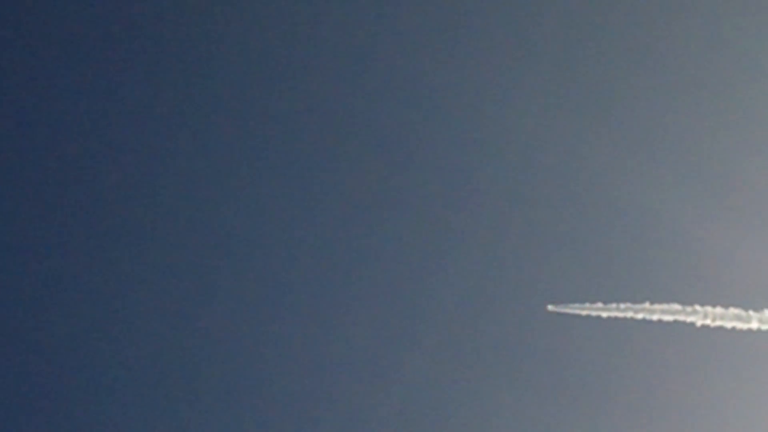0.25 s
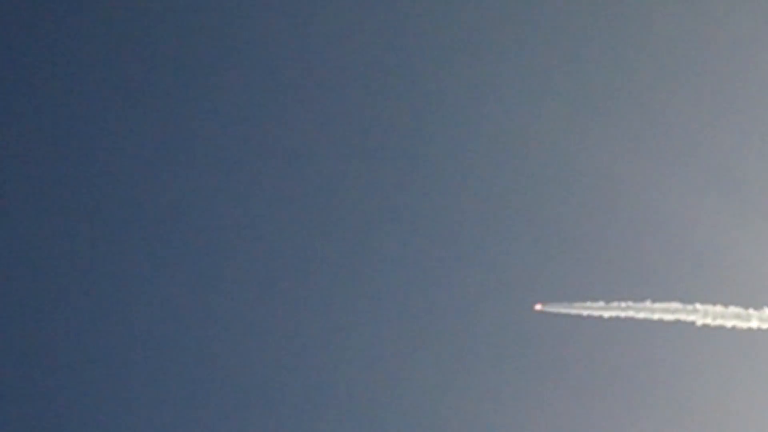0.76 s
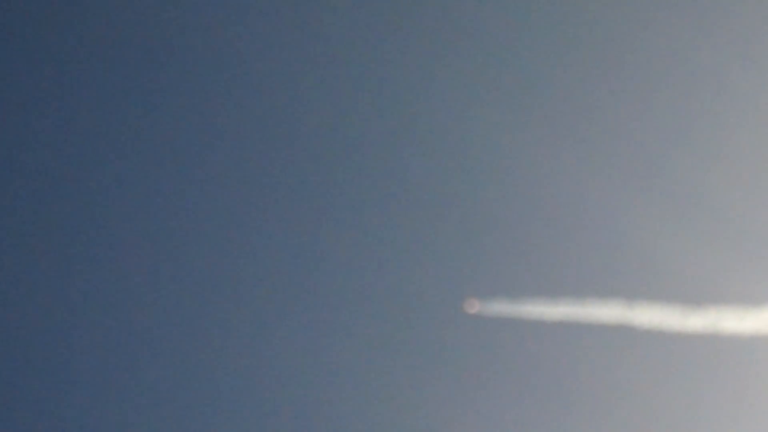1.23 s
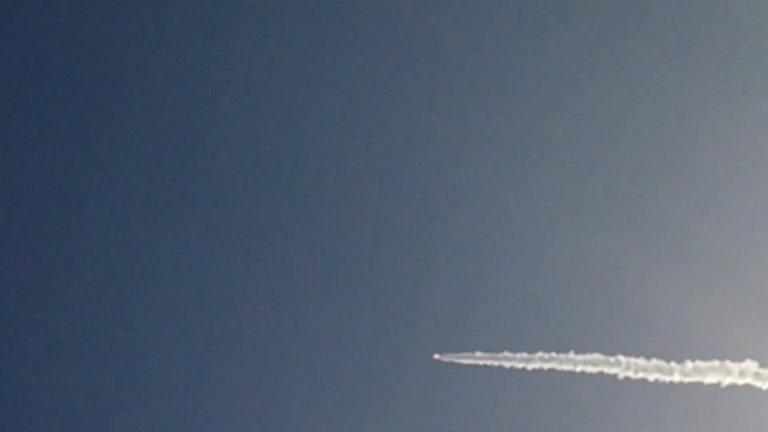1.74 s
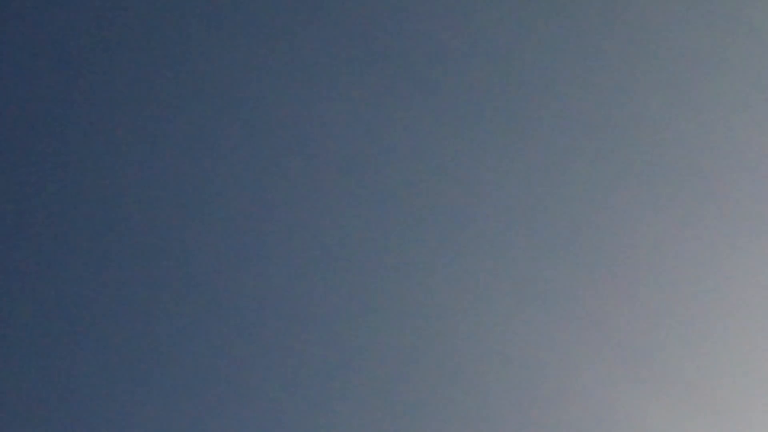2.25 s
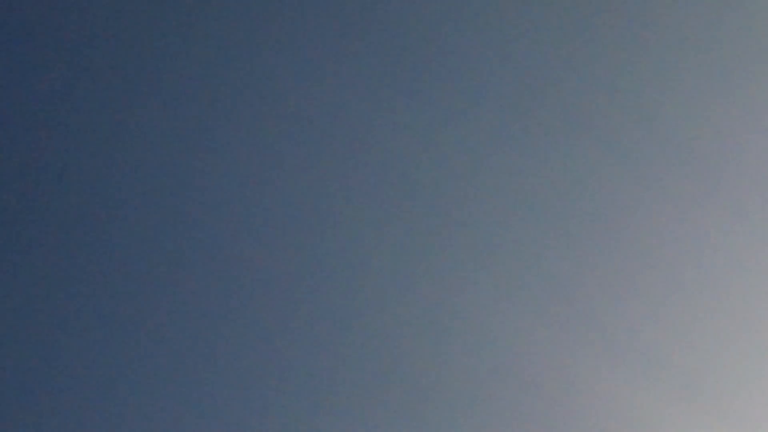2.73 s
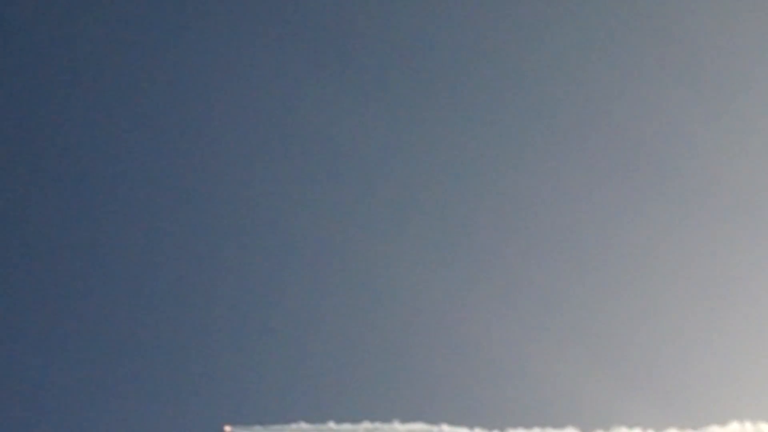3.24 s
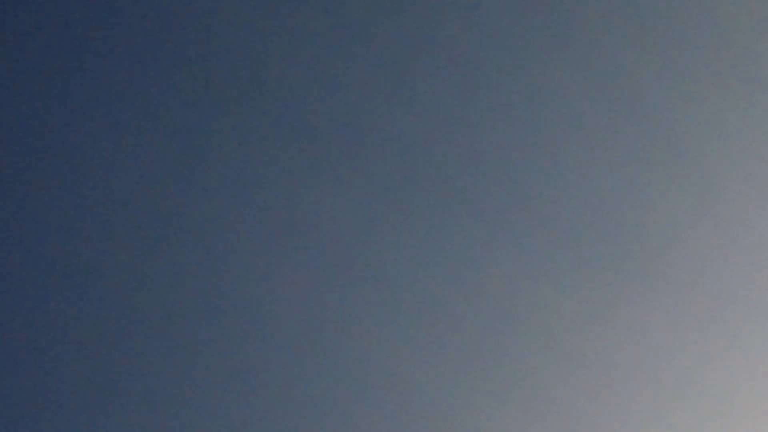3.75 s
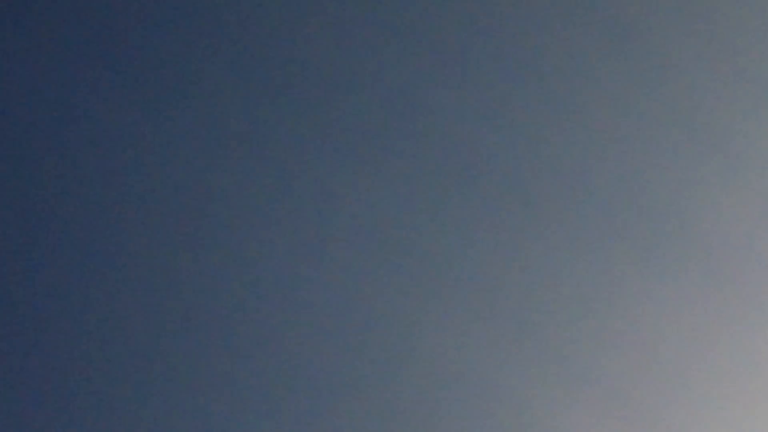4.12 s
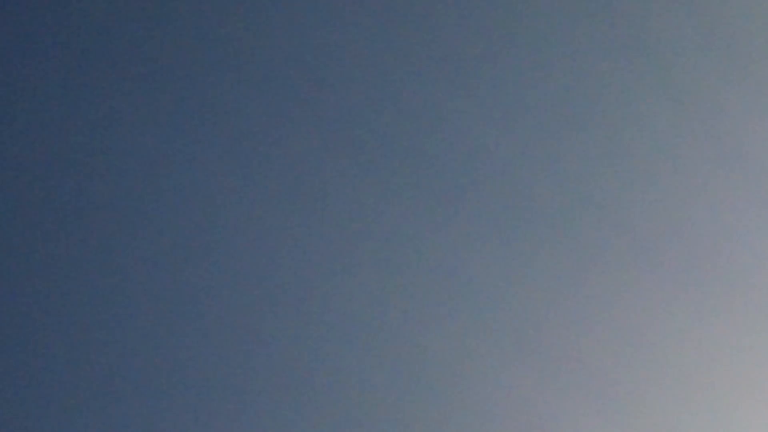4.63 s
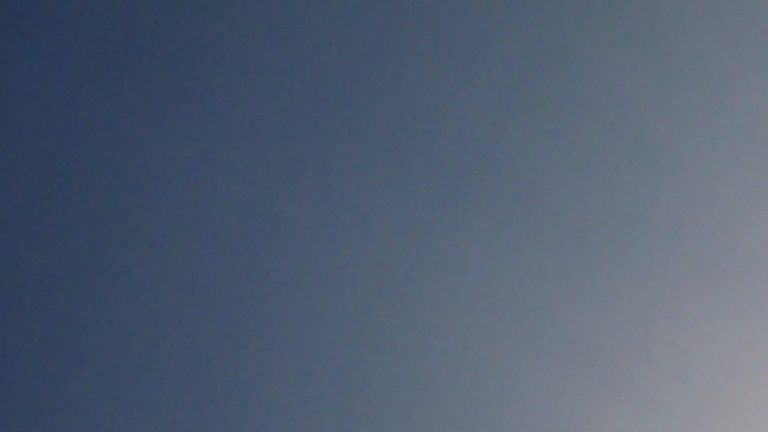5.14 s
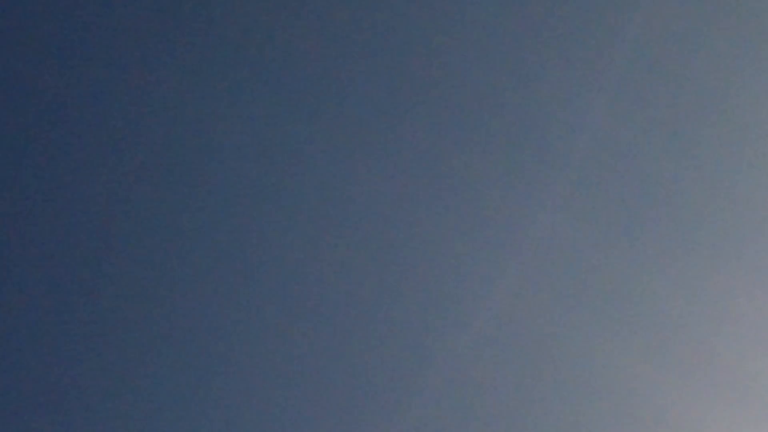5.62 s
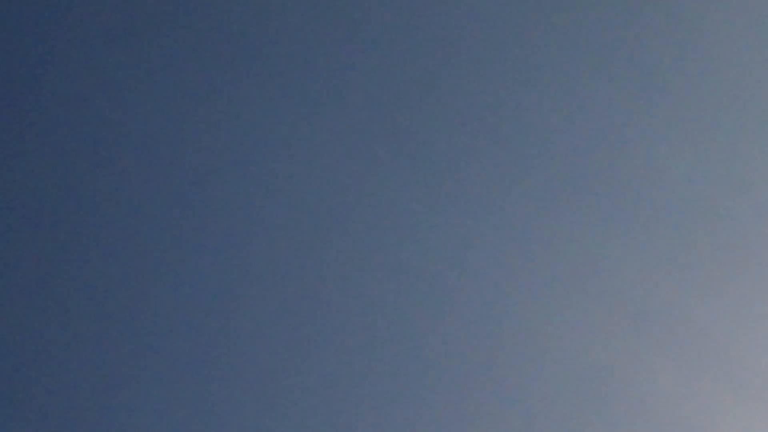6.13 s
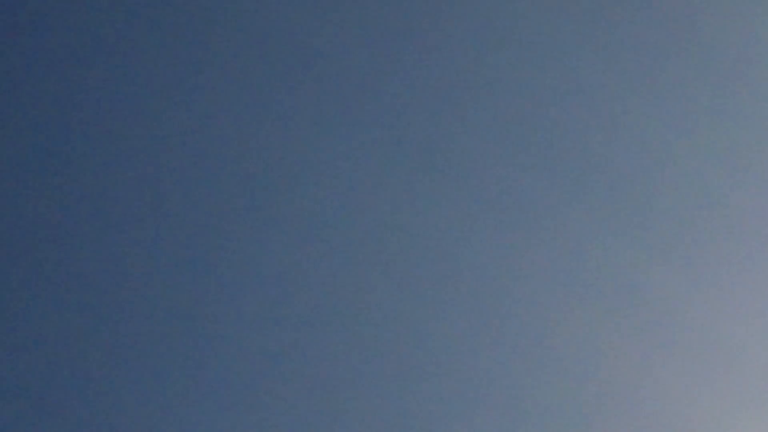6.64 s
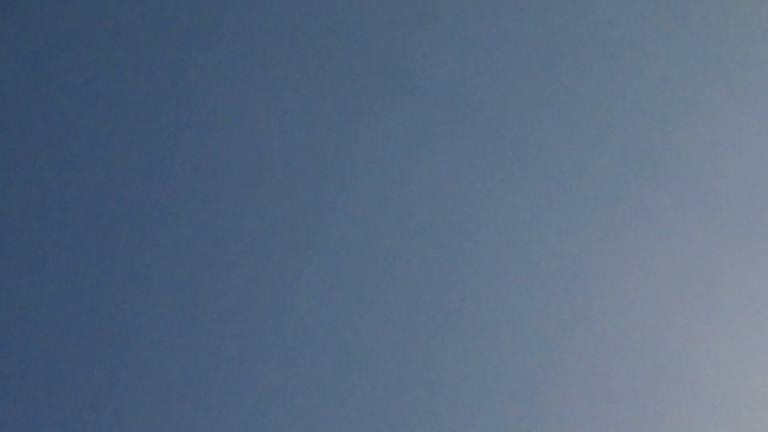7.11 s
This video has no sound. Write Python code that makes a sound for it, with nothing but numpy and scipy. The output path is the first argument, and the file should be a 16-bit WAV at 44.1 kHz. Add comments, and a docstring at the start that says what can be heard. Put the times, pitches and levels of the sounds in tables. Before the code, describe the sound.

Already under way at 0 s, a distant climbing rocket makes a deep, heavy rumble and a grainy, fluttering roar, mostly low and low-mid. Through the first second, strong cracks and thumps crowd together, several in each tenth of a second, like thick cloth tearing. From about 1.1 s they thin into duller, separate thuds, sparse around 2 to 2.6 s. Near 3 s they bunch again, with hard cracks at about 3.0, 3.2 and 3.4 s, then loosen. At 4.5 s a faint fuzzy whistle glides slightly upward for under half a second; tiny dry ticks appear occasionally before 5 s. Irregular cracks continue, with a strong snap near 6.65 s, then softer thumps until the abrupt end around 7.4 s. Short ground and wall reflections roughen everything. The small stereo microphone hisses faintly, dips its level after peaks and can clip.

```python
"""A rocket climbs far away, and its exhaust sends out shock fronts rounded by kilometres of air.
From the start, strong shocks and repeats crack over a roar of countless small ones and a noise rumble.
They thin out after about one second and bunch up again near three; the ground and walls repeat them.
At 4.5 s a short fuzzy whistle rises, made from a gliding tone; a few dry noise ticks sound before 5 s.
Cracks go on to the end; the small two-port microphone hisses, turns itself down and can overload."""
import sys
import numpy as np
from scipy import signal
from scipy.fft import rfft, irfft, next_fast_len
from scipy.io import wavfile

SR = 44100
rng = np.random.default_rng(int(sys.argv[2]) if len(sys.argv) > 2 else 0)


def transcribe(u):
    """Save the signal u as a 16-bit wav file named by the first command-line argument.

    u: samples, shape (n,) or (channels, n), limited to [-1, 1]; the rate is SR.
    q: integer samples, one column per channel.
    """
    v = np.clip(np.atleast_2d(u).T, -1, 1)
    q = np.round(v * 32767).astype(np.int16)
    wavfile.write(sys.argv[1], SR, q)


N = 325007  # length in samples

# The shocks that stand out, and some of their strong repeats, in four parts: thump, crack, edge, snap.
# Columns: start_s, crack_peak_db, then relative to the crack: thump_db, edge_db, snap_db
SHOCKS = [(0.048, -22, 8, -28, -62), (0.0731, -23.5, 6.5, -12.0, -47), (0.0992, -16.5, 4, -14, -36),
          (0.1639, -18, 8.5, -5, -26), (0.1789, -22.5, 2, -7, -32), (0.2232, -19, 1, -19.5, -55),
          (0.2488, -19.5, 4, -11.5, -56), (0.2739, -20.5, 5.5, -13.5, -46),
          (0.3076, -26.5, -2.5, -18.5, -51), (0.3381, -17, 6, -11, -31), (0.3538, -12, 3.5, -17.5, -38.5),
          (0.4195, -15, 7.5, -14, -30.0), (0.4355, -19.5, 8.5, -26, -61), (0.486, -26.5, 2.5, -9.5, -53),
          (0.4971, -23.5, 5, -10, -55), (0.5326, -16, 4, -10.5, -34), (0.551, -25.5, 9, -10, -41),
          (0.5791, -20.5, 2, -10.5, -46), (0.5886, -18, 3.5, -16, -47), (0.6173, -18.5, 3.5, -12, -47),
          (0.6732, -20.5, 6, -21, -56), (0.683, -22, 0, -12, -55), (0.7072, -16, 1, -9.5, -39),
          (0.7177, -21, 5.5, -15, -43), (0.7543, -21, 2.5, -9.5, -60), (0.7798, -18.5, 0.5, -25.5, -39),
          (0.8199, -22.5, 8, -4.5, -28.5), (0.8588, -20.5, 8, -17, -57), (0.8879, -22, 9.5, -16.5, -56.0),
          (0.9158, -17.5, 4, -15, -40.5), (0.965, -15, -1.5, -31.5, -60), (0.9951, -22, 3, -15.5, -41),
          (1.0173, -20.0, 3.5, -13, -52), (1.0508, -19.5, 8, -9, -26.5), (1.2299, -24.0, 3, -10, -38),
          (1.2672, -27, 15, -3.5, -37), (1.3799, -21.5, 9, -19.5, -39), (1.4171, -23.5, 5.5, -11, -38),
          (1.557, -24.5, 9, -14, -39), (1.5705, -22.5, 6.5, -25.5, -36), (1.5934, -26, 15, -10.5, -42),
          (1.6537, -24.5, 9, -19.5, -35.5), (1.6901, -25.5, 8.5, -23, -36), (1.7462, -22.5, 11, -15, -49),
          (1.7821, -23.5, 6.5, -16.5, -30), (1.829, -36, 10, -9, -42), (1.917, -32.5, 8, -4.5, -45),
          (2.3767, -22.5, 10, -23.5, -34), (2.712, -28, 10, -23, -45), (2.7283, -20, 7, -34, -38),
          (2.7613, -19, 4.5, -26, -50), (2.8098, -23, 9.5, -26, -34), (2.8988, -28.5, -1.5, -20, -49),
          (2.9509, -16.5, -1, -17.5, -44.0), (3.0192, -20, 5, -25, -34), (3.036, -14, 5, -14, -25.5),
          (3.0641, -30.5, 7, -11, -59), (3.1023, -24.5, 0, -10.5, -41), (3.177, -13, 0.5, -11.5, -31),
          (3.238, -19.5, 5.5, -7, -35), (3.2666, -21, 0, -7, -41), (3.351, -31, 12.5, -7, -41),
          (3.372, -29.5, 3, -10, -45), (3.386, -29, 1.5, -7, -45), (3.408, -17, 2, -7, -30),
          (3.467, -27.5, -0.5, -7, -35), (3.4926, -25, 1, -6.5, -47), (3.519, -26.5, 1.5, -13, -46),
          (3.8404, -27, 4, -14, -40), (3.8719, -23, 5, -18, -40), (3.8848, -21.5, 2, -21, -33),
          (3.9825, -22.5, 6.5, -23, -30), (4.0162, -24, 11.5, -21.5, -48), (4.0464, -27.5, -1, -13.5, -44),
          (4.0574, -30, 7.5, -2, -43.5), (4.1062, -24, 3.5, -21, -37), (4.135, -23.5, 4.5, -16.5, -44),
          (4.259, -25, 6, -26, -48), (4.3505, -19.5, 9, -16, -32), (4.4069, -25.5, -8, -12, -62.5),
          (4.5222, -25.5, 12.5, -16, -36), (4.549, -22, 6, -30, -42), (4.5783, -22.5, 11, -18, -41),
          (4.753, -24, 8.5, -24, -47.5), (4.8473, -25.5, 10, -29, -44.5), (4.8847, -25.5, -1, -22, -37),
          (4.9043, -24.5, 5, -15, -35), (4.922, -24, 16, -8, -35), (4.965, -18.5, 3.5, -13.5, -29.5),
          (5.0618, -23, 0, -13.5, -41), (5.0933, -18.0, -3.5, -25.5, -38.5), (5.1365, -16.5, 3, -13.5, -41),
          (5.214, -21, 7, -17.5, -61), (5.2624, -21.5, 5.5, -19, -67), (5.3856, -23.5, 3, -15.5, -65),
          (5.4255, -21.5, 11, -18.5, -32.0), (5.5449, -22.0, 5.5, -21.5, -55), (5.5986, -27, 16.5, -7, -40),
          (5.6837, -20.5, 11.5, -14.5, -33), (5.7522, -25.5, 5, -15, -38.0), (5.8844, -24.5, 5.5, -14, -54),
          (5.938, -26, 8.5, -11, -52), (6.0225, -28, 9.5, -5.5, -56), (6.067, -26, 13.5, -6.5, -59),
          (6.1306, -16.5, 9, -11, -32.5), (6.1516, -25.5, 2, -14.5, -38), (6.1663, -22, 0, -10.5, -64.5),
          (6.2081, -24.5, 4, -12.5, -57), (6.3676, -21, -1, -14, -49), (6.421, -18, 8, -13, -46.5),
          (6.467, -19, 5.5, -13, -47), (6.5185, -16, 4, -13.5, -57), (6.6516, -13.5, 4, -13.5, -22.5),
          (6.767, -25, 2, -31, -47), (6.8216, -22, 3.5, -18, -45), (6.9051, -23, 12, -19, -46),
          (6.999, -25, 12, -28, -41), (7.043, -25, 6.5, -26, -45), (7.078, -26.5, 11.5, -22, -48),
          (7.168, -25, 14, -30, -45), (7.291, -30.5, 13, -22, -48), (7.335, -27.5, 12, -12, -46)]
# How loud the steady sounds are over time, as rms before the microphone.
# Columns: time_s, roar_thump_db, deep_rumble_db, treble_hiss_db, roar_crack_db, roar_edge_db, upper_rumble_db
LEVELS = [(0.0, -25, -20, -73, -35, -62, -32.5), (0.29, -21, -24.5, -70.5, -41, -50.5, -25),
          (0.65, -23, -26, -70.5, -34.5, -54, -30.5), (1.09, -21, -22, -69.5, -37, -59, -34),
          (1.54, -23, -21.5, -69.5, -40.5, -54.5, -33), (2.26, -27, -24, -71, -46, -58.5, -31.5),
          (2.81, -24.5, -23.5, -67.5, -38.5, -60.5, -30), (3.12, -28.5, -24, -70, -36, -58, -25.5),
          (3.65, -26.5, -25.5, -71, -42, -58.5, -33.5), (4.17, -23, -23, -67.5, -37.5, -57, -24),
          (4.53, -22, -26, -65.5, -42, -61, -30.5), (4.95, -21.5, -24, -66, -37.5, -52.5, -28),
          (5.42, -20.5, -27.5, -69, -44, -60, -32), (5.83, -17.5, -26, -71.5, -41, -56.5, -37.5),
          (6.28, -21.5, -25.5, -71, -38, -58.5, -37), (6.42, -20, -24.5, -68, -39, -55, -30),
          (6.77, -24.5, -28.5, -72.5, -40, -66.5, -35.5), (7.1, -27.5, -27.5, -72.5, -41, -65.5, -28),
          (7.37, -22, -18.5, -70, -46, -61.5, -30.5)]
# The tone balance of one shock rounded by the air. Columns: pitch_hz, relative_level_db
FRONT = [(20, -18.5), (80, -2.5), (165, -2.5), (250, 2), (330, -1.5), (400, -5.5), (480, -11.5),
         (580, -8.5), (690, -10.5), (830, -18.5), (1000, -19.5), (1250, -22.5), (1470, -29), (2000, -31.5),
         (2500, -35), (3300, -39.5), (6000, -53.5), (9000, -69), (16000, -92)]
# The tone balance of the deep rumble. Columns: pitch_hz, relative_level_db (per Hz)
RUMBLE = [(7.1, -43.5), (12, -7.5), (48, 1), (85, 0.5), (110, -15), (160, -32.5), (400, -120)]
# Repeats from the ground (first row, delay at mid-scene) and walls; a minus gain turns the wave over.
# Columns: delay_ms, left_gain (factor), right_gain (factor), treble_limit_hz
ECHOES = [(3.65, 0.31, 0.41, 2400), (6.3, 0.17, -0.14, 4400), (8.18, 0.014, 0.11, 1200),
          (9.23, 0.25, 0.0076, 2000), (10.69, 0.038, -.1, 1200), (16.26, 0.02, 0.088, 4100),
          (21.79, 0.25, 0.067, 2600), (28.26, 0.11, 0.24, 620)]
# How the two ports hear the far sound. Columns: pitch_hz, left_minus_right_db, left_lead_rad
PORTS = [(20, -7, .4), (60, -7, .4), (116, -4.5, .7), (184, -3.5, .1), (304, -2.5, -.05), (560, -4, .05),
         (900, -1.5, -.05), (1290, -.3, -.1), (1470, .3, -.6), (1810, 2, -1.7), (2330, 1, -2.7),
         (2700, .2, -3.1), (4500, .2, -3.2)]
# The tone balance of the microphone's own hiss. Columns: pitch_hz, relative_level_db (per Hz)
SELF_NOISE = [(1500, 17.5), (4000, -1), (6000, -0.5), (9000, -4), (15500, -4.5)]
# Faint dry ticks close to the microphone; t60 is the time to fade by 60 dB.
# Columns: start_s, peak_db (midway between sides), pitch_hz, t60_s, left_minus_right_db
TICKS = [(.872, -59, 9500, 0.012, -1), (1.782, -48, 3990, .006, 3), (2.162, -48, 3720, 0.0067, 6),
         (2.379, -48, 3830, 0.0077, 4), (4.343, -49.5, 4460, 0.024, 12), (4.827, -50, 4650, 0.017, 7.5), ]
# Pitch range in which each part's level is set: thump, crack, edge, snap. Columns: low_hz, high_hz
PARTS_HZ = (150, 500), (500, 1200), (1200, 2500), (3000, 7000)
# A faint whistle inside the roar.
# Columns: start_s, length_s, from_hz, to_hz, fuzz_width_hz, level_db (before swell and fuzz)
WHISTLE = (4.5, 0.43, 1336, 1411, 24.5, -48)

SELF_NOISE_DB, EDGE_HZ = -60, 15550  # rms of the microphone hiss; top of its pitch range
LIMIT_DB, DUCK = -5, 0.63  # gain control: where it starts; share of the excess dB taken away
RECOVER_DB_PER_S, GRIP_S = 9, 0.0026  # fall of the remembered peak; smoothing time of the control
GROUND_DRIFT_MS_PER_S = .09  # the ground bounce lags more as the rocket climbs
LEAD = 256  # samples kept ahead of each front
SIZE = next_fast_len(N + SR)  # room for filter tails
HZ = np.fft.rfftfreq(SIZE, 1 / SR)


def crackle(splinter_db=-14.5, splinter_s=0.024, count=5):
    """Plays the shocks and repeats that stand out; turbulence breaks weaker, duller splinters off each."""
    s, db, thump_db, edge_db, snap_db = np.transpose(SHOCKS)
    sizes = gain_of(db + np.array([thump_db, 0 * db, edge_db, snap_db]))
    trains = np.zeros((4, N))
    trains[:, (s * SR).astype(int)] = sizes
    late, weak = rng.random((len(s), count, 2)).T
    for after, down in zip(.002 + splinter_s * late ** 1.5, weak):
        # thump, crack, edge, snap
        loss_db = splinter_db - 8 * down + np.array([[-3], [0], [-7], [-18]])
        trains[:, ((s + after) * SR).astype(int)] += sizes * gain_of(loss_db)
    return fronts(trains)


def roar(per_s=340, spread_db=3.0, softening_db=-1.7, clump_s=0.0058,
         thump_clump_db=1.12, clump_db=1.0, edge_clump_db=1.5):
    """Countless small shocks at random; larger ones are duller, and louder ones come in clumps."""
    when = rng.random(N) < per_s / SR
    size = np.minimum(rng.exponential(1, N), 3.5)
    smoothing = np.exp(-(2 * np.pi * HZ * clump_s) ** 2 / 2)
    clumps = evened(coloured(rng.standard_normal(N), smoothing))
    train = when * gain_of(spread_db * size)
    # larger shocks have less crack and edge beside the thump
    crack = gain_of(softening_db * size + clump_db * clumps)
    thump = gain_of(thump_clump_db * clumps)
    edge = crack * gain_of(edge_clump_db * clumps)
    parts = fronts(train * np.array([thump, crack, edge, np.zeros(N)]))[:3]  # no snap
    parts = parts - parts.mean(1, keepdims=True)
    # even out each part as the ports hear it, then follow its level curve
    heard = coloured(parts, bands(HZ)[:3] * (ports() * echoes()).mean(0)).std(1)
    return sum(level(LEVELS, order=k) * part / rms for k, part, rms in zip((1, 4, 5), parts, heard))


def fronts(trains):
    """Puts a shock front wherever a train has a size, with one train for each part."""
    return signal.oaconvolve(trains, shock(), axes=1)[:, LEAD:N + LEAD]


def shock():
    """One front split into four parts, each scaled to peak 1 midway between the ports in its pitch range."""
    count = 8192
    hz = np.fft.rfftfreq(count, 1 / SR)
    log_gain = np.log(gain_of(read(FRONT, abs(np.fft.fftfreq(count, 1 / SR)))))
    # choose the phase so that the front starts sharply, then move it LEAD samples later
    shift = 2j * np.pi * np.arange(count) * LEAD / count
    front = np.exp(np.conj(signal.hilbert(log_gain)) - shift)[:len(hz)]
    below = [1 / (1 + (hz / corner_hz) ** 4) for corner_hz in (435, 1140, 2450)]
    parts = front * np.diff([0 * hz, *below, 1 + 0 * hz], axis=0)
    path = (ports(hz) * echoes(hz)).mean(0)
    # the snap, a bright overload-like burst, skips the echo and port filters
    filters = [path, path, path, 1 + 0 * hz]
    heard = abs(signal.hilbert(irfft(parts * bands(hz) * filters)))
    lined_up = np.roll(irfft(parts), LEAD - heard[1].argmax(), axis=1)  # crack peaks at LEAD
    return lined_up[:, :4096] / heard.max(1)[:, None]


def bands(hz):
    """Marks the pitches where each part of a shock has its level set."""
    return np.array([(hz > lo) & (hz < hi) for lo, hi in PARTS_HZ])


def ragged(x, tail_db, tail_s, turns_per_s=7.3):
    """Turbulence frays the front's treble: part of it trails in, coloured by slowly changing paths."""
    tail = in_turns(x, paths(tail_s, 0.00085, channels=1, share=0.32), turns_per_s)[0]
    return (x + gain_of(tail_db) * tail) / np.sqrt(1 + gain_of(2 * tail_db))


def ground(x):
    """The first repeat bounces off the ground, and its delay grows steadily around its middle value."""
    delay_ms, left, right, limit_hz = ECHOES[0]
    t = np.arange(N) / SR
    late = t - (delay_ms + GROUND_DRIFT_MS_PER_S * (t - t.mean())) / 1000
    dulled = coloured(x, 1 / (1 + 1j * HZ / limit_hz) ** 2)
    return np.outer([left, right], np.interp(late, t, dulled))


def echoes(hz=HZ, order=0):
    """Adds delayed, dulled repeats to the direct sound at each port, from table row order on."""
    delay_ms, left, right, limit_hz = np.transpose(ECHOES[order:])
    delayed = np.exp(-2j * np.pi * np.outer(delay_ms / 1000, hz))
    single = delayed / (1 + 1j * hz / limit_hz[:, None]) ** 2
    return 1 + np.array([left, right]) @ single


def scattered(x, left_db=-7, right_db=-6.0, scatter_s=0.057, turns_per_s=1.296, dull_hz=850):
    """A short tail of many weak paths, whose treble is swallowed by grass and bushes."""
    taps = paths(scatter_s, 0.0039, channels=2)
    taps = signal.lfilter(*signal.butter(2, dull_hz, fs=SR), taps)
    return gain_of([[left_db], [right_db]]) * in_turns(x, taps, turns_per_s)


def paths(t60, start_s, channels, share=.05):
    """Three sets of random paths that die away by 60 dB in t60 seconds, each of energy 1."""
    t = np.arange(SR // 4) / SR
    shape = 3, channels, len(t)
    taps = rng.standard_normal(shape) * (rng.random(shape) < share)
    taps = taps * gain_of(-60 * t / t60) * (t > start_s)
    return taps / np.linalg.norm(taps, axis=2, keepdims=True)


def in_turns(x, taps, turns_per_s):
    """Three sets of paths take turns as the rocket and the air move."""
    phase = turns_per_s * np.arange(N) / SR + np.arange(3)[:, None] / 3
    turn = np.cos(np.pi * phase) * np.sqrt(2 / 3)
    return signal.oaconvolve((x * turn)[:, None], taps, axes=2)[..., :N].sum(0)


def ports(hz=HZ):
    """Gives half of the level and phase difference between the ports to each side."""
    left = gain_of(read(PORTS, hz) / 2) * np.exp(.5j * read(PORTS, hz, order=2))
    return np.array([left, 1 / left])


def steered(pair, from_hz=1300, wander_per_s=2.3, diffuse_db=-4, diffuse_s=.09, lean=0.075):
    """Turns the treble difference between ports in phase and adds a diffuse tail, a little more on the left."""
    both, apart = (pair[0] + pair[1]) / 2, (pair[0] - pair[1]) / 2
    high = coloured(apart, 1 / (1 + (from_hz / (HZ + 1)) ** 8))
    spin = np.exp(2j * np.pi * wander_per_s * np.arange(N) / SR)
    turned = (signal.hilbert(high, SIZE)[:N] * spin).real
    tail = in_turns(high, paths(diffuse_s, .001, channels=1, share=0.21), wander_per_s)[0]
    arriving = (turned + gain_of(diffuse_db) * tail) / np.sqrt(1 + gain_of(2 * diffuse_db))
    return both + np.outer([1, -1], apart - high) + np.outer([1 + lean, lean - 1], arriving)


def rumble(upper_hz=125, upper_width_hz=22):
    """Large eddies of the plume make deep noise that air does not absorb, and a narrower drone above it."""
    deep, upper = rng.standard_normal((2, N))
    deep = evened(coloured(deep, gain_of(read(RUMBLE, HZ))))
    upper = evened(coloured(upper, np.exp(-((HZ - upper_hz) / upper_width_hz) ** 2)))
    return np.array([level(LEVELS, order=2) * deep, level(LEVELS, order=6) * upper])


def deep_pair(deep_same=.93, upper_same=.6):
    """The rumble at both ports is partly unrelated, the drone more so."""
    same = np.clip([[deep_same], [upper_same]], 0, 1)
    own = np.array([rumble(), rumble()])
    return (np.sqrt(same) * rumble() + np.sqrt(1 - same) * own).sum(1)


def whistle():
    """A gliding tone swells and fades, while noise shakes its loudness and makes it fuzzy."""
    s, length, from_hz, to_hz, width_hz, db = WHISTLE
    u = np.clip((np.arange(N) / SR - s) / length, 0, 1)  # progress from 0 to 1
    fuzz = evened(coloured(rng.standard_normal(N), np.exp(-(HZ / width_hz) ** 2)))
    tone = np.sin(2 * np.pi * np.cumsum(from_hz + (to_hz - from_hz) * u) / SR)
    return gain_of(db) * np.sin(np.pi * u) * (1 + .5 * fuzz) * tone


def treble_hiss(hz=3600, width_hz=1100):
    """A faint band of noise swells slowly, mostly alike at both ports."""
    shared, own = rng.standard_normal(N), rng.standard_normal((2, N))
    band = np.exp(-((HZ - hz) / width_hz) ** 2)
    return level(LEVELS, order=3) * evened(coloured(shared + .5 * own, band))


def ticks():
    """Short bursts of noise fade quickly around one bright pitch."""
    out, t = np.zeros((2, N)), np.arange(1500) / SR
    for s, db, hz, t60, pan_db in TICKS:
        band = signal.butter(2, [hz * 0.78, hz * 1.3], "band", fs=SR, output="sos")
        burst = signal.sosfilt(band, rng.standard_normal(len(t)) * gain_of(-60 * t / t60))
        sides = gain_of(db + np.array([[.5], [-.5]]) * pan_db)
        out[:, round(s * SR):][:, :len(t)] += sides * burst / abs(burst).max()
    return out


def gain_of(db):
    """Turns decibels into a factor."""
    return 10 ** (np.asarray(db) / 20)


def evened(x):
    """Scales a sound to an rms (average strength) of 1."""
    return x / np.sqrt(np.mean(x ** 2) + 1e-20)


def read(points, hz, order=1):
    """Reads one table column at any pitch, evenly between points on a log scale."""
    table = np.transpose(points)
    return np.interp(np.log(hz + 1), np.log(table[0]), table[order])


def level(rows, order=1):
    """Reads one level column over time, as a factor for each sample."""
    table = np.transpose(rows)
    return gain_of(np.interp(np.arange(N) / SR, table[0], table[order]))


def coloured(x, gain):
    """Filters a sound by giving each pitch its own gain and phase."""
    return irfft(rfft(x, SIZE) * gain, SIZE)[..., :N]


def scene(snap_left_db=-2.5, snap_right_db=6.5):
    """Mixes all sources at the two ports; the snap comes in step at both, stronger on the right."""
    thump, crack, edge, snap = crackle()
    shocks = roar() + thump + ragged(crack + edge, tail_db=-5, tail_s=0.027)
    far = coloured(shocks, echoes(order=1)) + ground(shocks)  # ground is row 0
    far = far + scattered(shocks) + deep_pair()
    snap = gain_of([[snap_left_db], [snap_right_db]]) * ragged(snap, tail_db=-5.5, tail_s=0.014)
    return steered(coloured(far, ports())) + snap + whistle() + treble_hiss() + ticks()


def ducked(x):
    """Gain control: the loudest peaks turn the level down quickly and it creeps back."""
    peak_db = 20 * np.log10(abs(x).max(0) + 1e-9)
    fall = np.arange(N) * RECOVER_DB_PER_S / SR
    held_db = np.maximum.accumulate(peak_db + fall) - fall  # highest peak, slowly forgotten
    over_db = np.maximum(held_db - LIMIT_DB, 0)
    keep = np.exp(-1 / (GRIP_S * SR))
    return x / gain_of(DUCK * signal.lfilter([1 - keep], [1, -keep], over_db))


def record(dry):
    """The microphone turns loud sound down, adds hiss, clips on overload and cuts the highest treble."""
    # each side is steered with a delayed share of the other, which combs the hiss
    feed = 0.34 * np.exp(-2j * np.pi * (HZ - 9630) * 0.00034)
    balance = gain_of(read(SELF_NOISE, HZ)) * (HZ > 1200)
    noise = coloured(rng.standard_normal((2, N)), balance)
    hiss = gain_of(SELF_NOISE_DB) * evened(noise + coloured(noise[::-1], feed))
    loud = np.clip(ducked(dry) + hiss, -1, 1)
    low_pass = signal.firwin(511, EDGE_HZ, window=("kaiser", 9), fs=SR)
    return signal.oaconvolve(loud, low_pass[None], "same")


dry = scene()
out = record(dry)
transcribe(out)
```